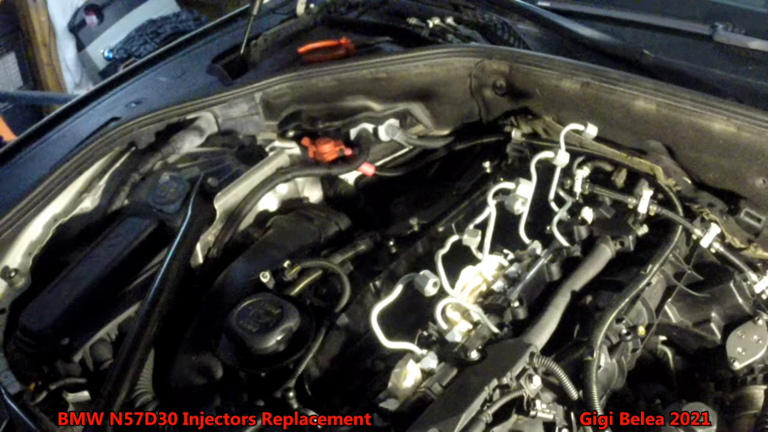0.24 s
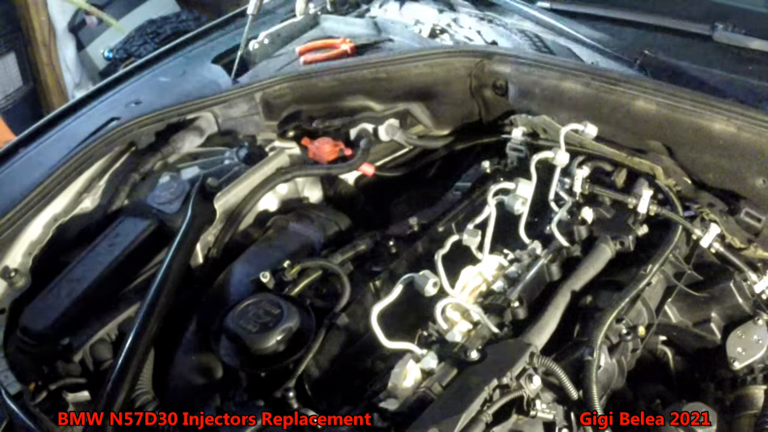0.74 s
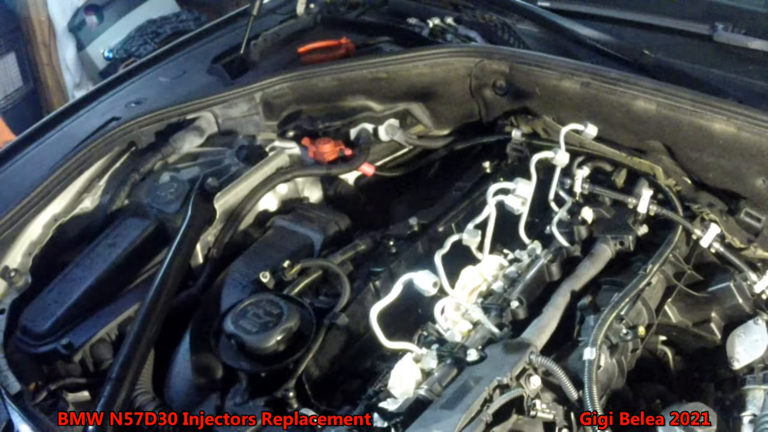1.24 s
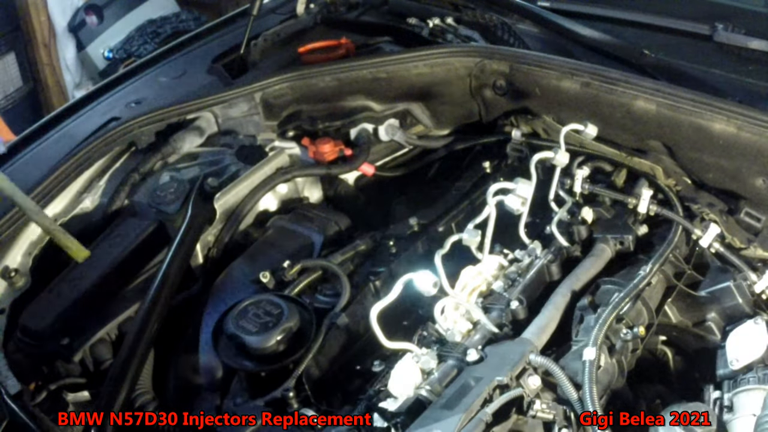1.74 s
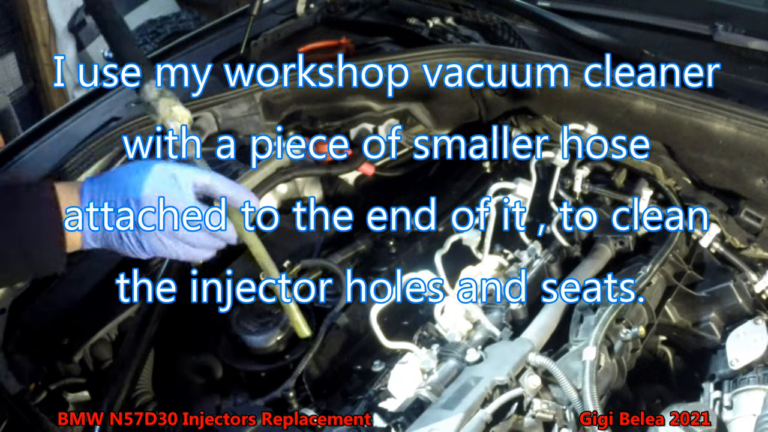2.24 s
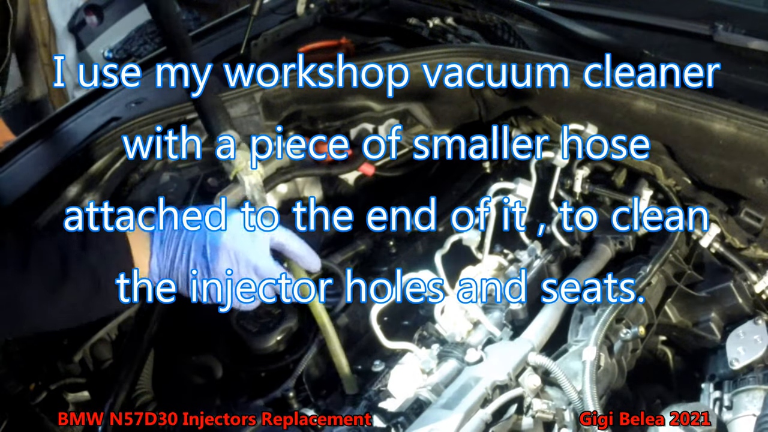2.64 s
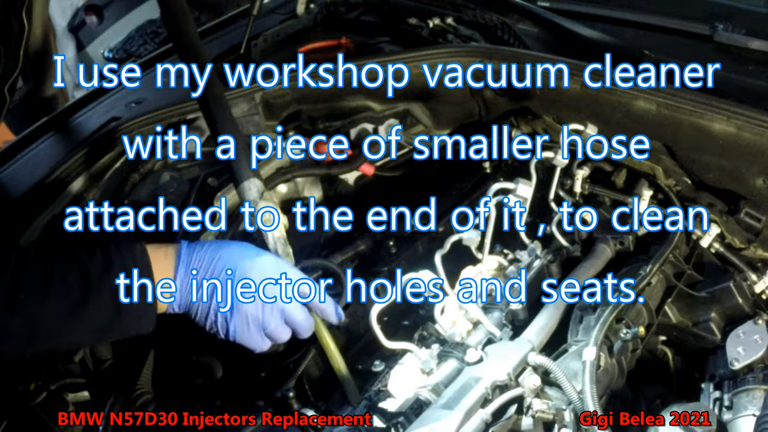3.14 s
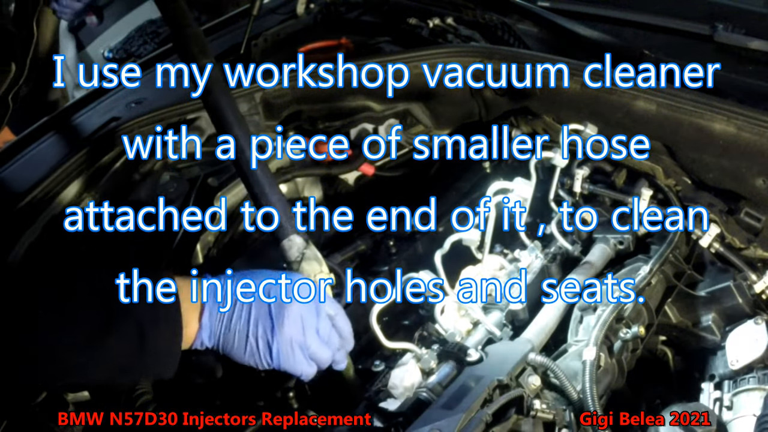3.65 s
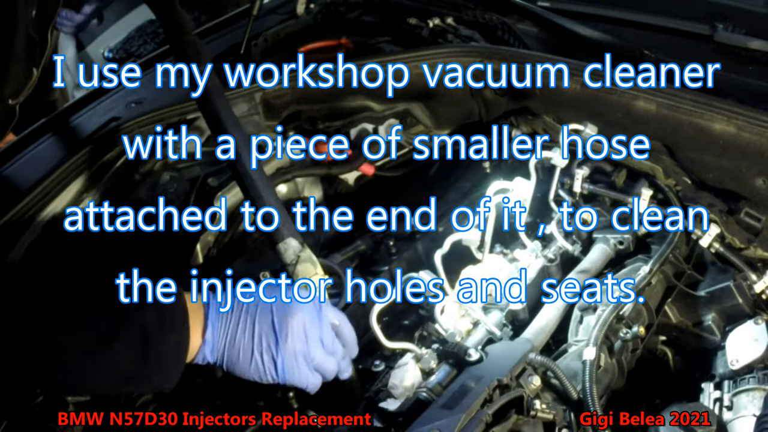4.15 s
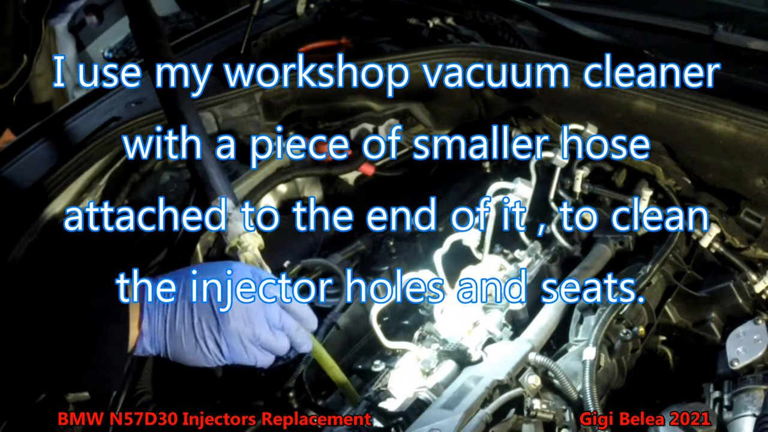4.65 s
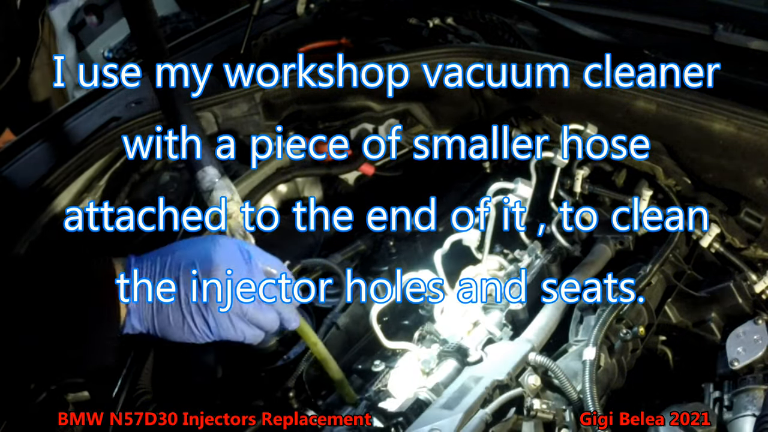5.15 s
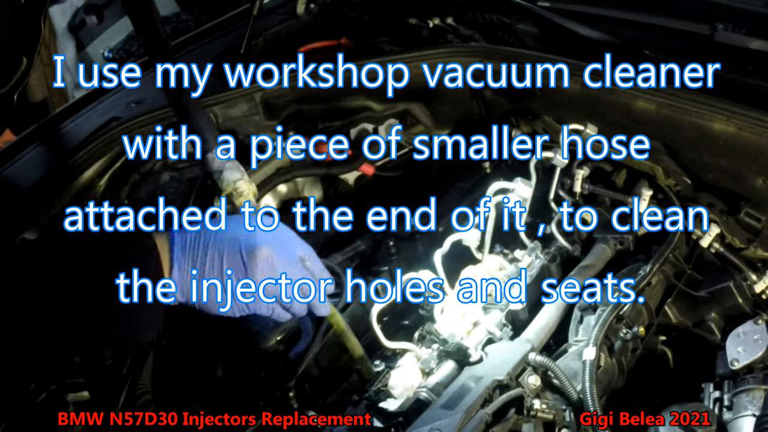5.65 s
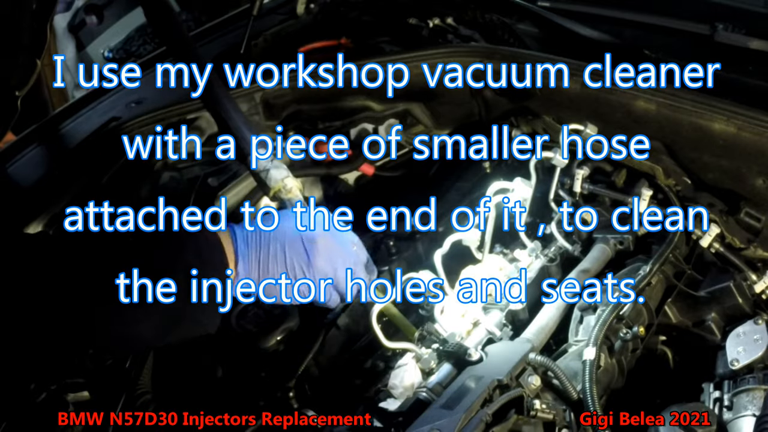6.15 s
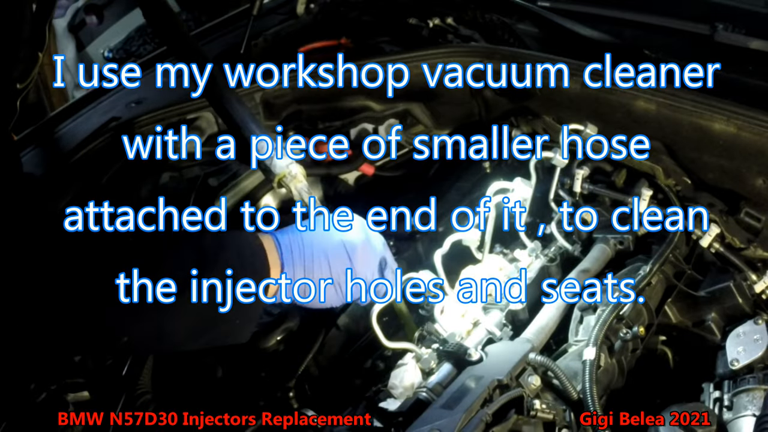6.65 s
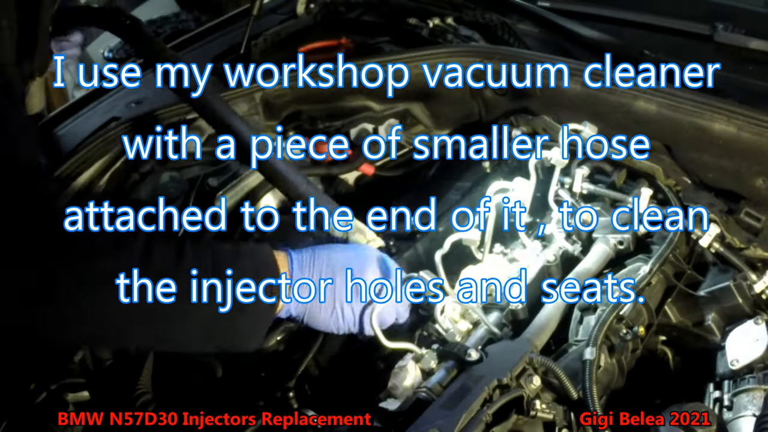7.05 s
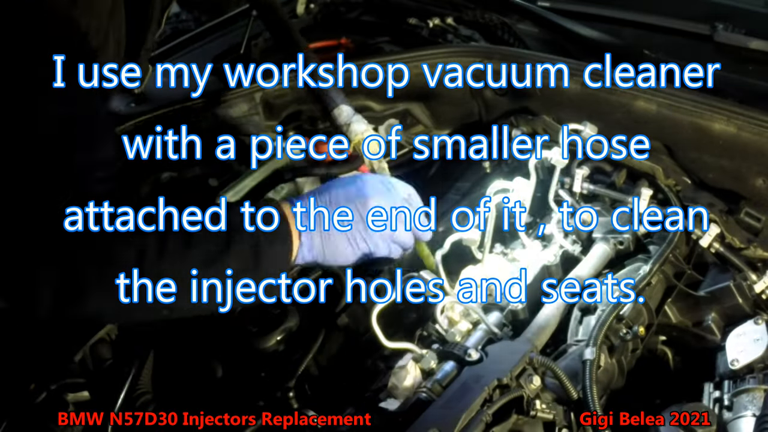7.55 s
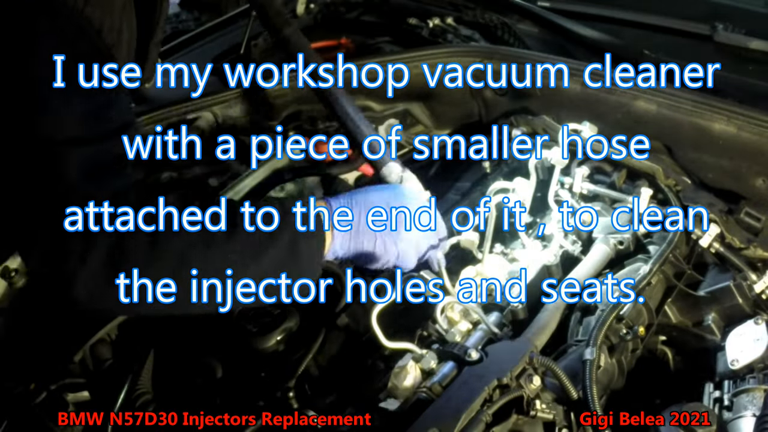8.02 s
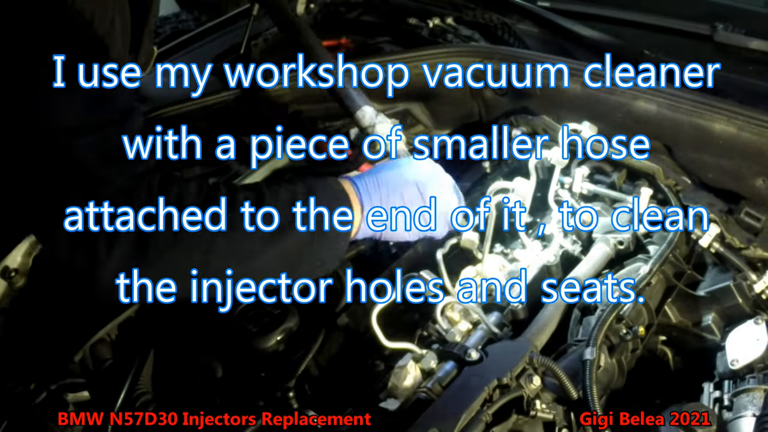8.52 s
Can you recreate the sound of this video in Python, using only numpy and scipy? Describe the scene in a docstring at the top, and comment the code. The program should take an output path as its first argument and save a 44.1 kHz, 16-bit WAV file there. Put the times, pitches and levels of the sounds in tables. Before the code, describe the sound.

A workshop vacuum spins up, hisses and flutters through a thin hose in an engine bay, then turns to a sped-up whistle and crackle.

```python
"""A workshop vacuum cleaner is switched on and spins up: shaft unbalance hums, fan blades sing, air roars
through the casing. Its thin hose is poked into an engine bay; air hisses past the tip, rasps and whistles
in the tube, and flutters when the tip half seals. Quiet room noise lies underneath. Near the end it all
runs ten times faster: the whine jumps to a high whistle, the flutter shrinks to crackles.
Both channels carry the same signal."""
import sys
import numpy as np
from scipy import signal
from scipy.fft import rfft, irfft, next_fast_len
from scipy.io import wavfile
from scipy.ndimage import uniform_filter1d

SR = 44100
rng = np.random.default_rng(int(sys.argv[2]) if len(sys.argv) > 2 else 0)


def wav_out(sig):
    """Save sig, one row per channel (or a flat mono array), as 16-bit PCM at SR to the path in sys.argv[1]."""
    wavfile.write(sys.argv[1], SR, np.round(np.clip(np.atleast_2d(sig).T, -1, 1) * 32767).astype(np.int16))


N = 387198

SWITCH_S, BORE_S, FAST_S = 0.127, 6.1, 6.806  # motor on; hiss takes the bore's colour; tenfold pace

# room noise spectrum: f/Hz, level/dB
ROOM_SPECTRUM = [(30, -7.5), (100, -6), (300, -5.5), (800, -1.5), (1500, -16.5), (3000, -30),
                 (5000, -35), (12000, -46)]
# faint room tones: f/Hz, level/dB
ROOM_TONES = [(3090, -69), (6180, -84), (9300, -88)]

# air spectra, past the tip and in the bore: f/Hz, level/dB
TIP_SPECTRUM = [(300, -16), (900, -2), (1500, -11), (2200, -8), (3000, -1.5), (4300, -7), (6000, -2),
                (8500, -8), (11000, -9.5), (14500, -28)]
BORE_SPECTRUM = [(300, -24), (900, 2.5), (1500, -11.5), (2200, -6.5), (3300, -8.5), (4400, -6.5),
                 (6000, -5), (8000, -7.5), (11000, -17), (14500, -35)]
# tip resonances: f/Hz, width/Hz, lift/dB
TIP_MODES = [(870, 43, 13.5), (1990, 140, 10), (4054, 61, 15), (4780, 65, 13.5), (5180, 72, 12),
             (5830, 360, 5), (7040, 170, 8.5), (8940, 470, 8), (10200, 450, 6)]
# pipe modes, fundamental first: lift/dB
PIPE_LIFTS = [7, 10, 11, 9, 6, 5]
# hose resonances: f/Hz, width/Hz, level/dB
RING_MODES = [(581, 166, -6), (885, 56, 3), (812.6, 14.5, -5), (1048, 102, -4), (1254, 100, -9.5),
              (1445, 29, -12.5), (1955, 380, -10.5), (2260, 270, -13.5)]
THUMP_MODES = [(124, 30, -1), (235, 120, -6.5), (550, 224, 9.5)]
WHISTLE_MODES = [(3924, 114, 6), (4340, 260, -0.5)]
# tip hiss among the engine parts, tube rasp: t/s, level/dB
HISS_LEVELS = [(2.6, -85), (2.8, -60), (2.87, -43), (3.3, -40.5), (3.8, -34.5), (4.3, -36.5), (4.9, -35),
               (5.04, -35), (5.4, -34.5), (5.8, -37), (5.92, -49)]
RASP_LEVELS = [(2.5, -90), (2.75, -55), (2.89, -32), (3.2, -23), (3.33, -38), (3.75, -34), (3.96, -30.5),
               (4.23, -34), (4.5, -28), (4.85, -23), (5.19, -43), (5.46, -34), (5.69, -35), (5.95, -53),
               (6.2, -43), (6.5, -31.5), (6.65, -31.5), (6.76, -60)]
# gushes as the tip comes free, tube whistles: t/s, length/s, level/dB
GUSHES = [(2.858, 0.028, -33.5), (3.13, 0.046, -37), (3.413, 0.04, -31.5), (3.511, 0.038, -30.5),
          (3.736, 0.052, -35), (3.862, 0.027, -29.5), (3.924, 0.033, -30), (4.007, .05, -39),
          (4.13, 0.052, -38), (4.396, .022, -32), (4.983, 0.032, -23.5), (5.085, 0.209, -24),
          (5.556, 0.15, -26), (6.129, 0.81, -24.5)]
WHISTLES = [(2.95, 1.4, -48), (3.16, 0.068, -32.5), (3.364, 0.11, -35.5), (4.426, .12, -38),
            (4.58, 0.24, -35.5), (4.86, .2, -43), (5.109, .18, -32.5), (5.353, 0.21, -30),
            (6.298, 0.13, -39)]
# tip seals and flutters: t/s, length/s, ring level/dB, thump re ring/dB
FLUTTERS = [(2.852, 0.081, -24, -28), (2.99, .036, -22, -30), (3.036, 0.085, -24.5, -23),
            (3.125, .064, -17.5, -7), (3.195, 0.028, -22, -5), (3.222, 0.016, -15.5, -11),
            (3.37, 0.14, -22, -9), (3.503, 0.026, -13.5, -12), (3.726, 0.048, -24.5, -25),
            (3.855, 0.034, -17, -14), (3.909, 0.038, -16, -15), (4.151, 0.038, -28.5, -7),
            (4.4, 0.027, -15.5, -20), (4.439, .051, -21.5, -7), (4.545, .08, -28, -11),
            (4.637, .045, -23, -9), (4.7, 0.018, -18.5, -26), (4.74, .076, -23, -6),
            (4.807, 0.045, -18, -21), (4.86, 0.088, -20.5, -32), (4.961, 0.037, -20, -14),
            (5.298, .031, -22, -24), (5.343, 0.071, -17.5, -14.5), (5.426, .052, -22.5, -25),
            (5.472, 0.024, -17.5, -16), (5.497, 0.082, -22.5, -17)]

# hose resonances, fast pace: f/Hz, width/Hz, level/dB
FAST_LOWER_MODES = [(5580, 690, 2.5), (6790, 600, 4.5), (7580, 670, 7)]
FAST_UPPER_MODES = [(8240, 550, -1), (8380, 440, 6.5), (8390, 260, -1), (9080, 300, -6)]
FAST_THUMP_MODES = [(1326, 230, 2.5), (1896, 420, 3)]
FAST_TOP1_MODES = [(10400, 720, 4.5), (10950, 360, -17), (11910, 470, 0)]
FAST_TOP2_MODES = [(13500, 270, -2), (14200, 300, -15), (13940, 610, 2), (15200, 350, -4)]
# fast flutters: t/s, length/s, upper ring level/dB, lower ring and thump offset/dB, top rings offset/dB
SPURTS = [(6.806, 0.092, -35, -6, -6), (6.967, 0.024, -27, 7, -2), (6.992, .042, -29.5, 8, -1),
          (7.115, 0.027, -28.5, 1, -14), (7.143, 0.064, -28.5, -8, -12), (7.22, 0.054, -39, 13.5, 2),
          (7.287, 0.012, -27, 3, 0), (7.337, 0.1, -33.5, 6, 1), (7.385, 0.031, -28.5, 6.5, -4),
          (7.434, .041, -40, -3, -2), (7.555, 0.14, -37.5, -4, -8), (7.712, 0.0053, -34.5, 10, -10),
          (7.743, 0.062, -32, 0, -8), (7.791, 0.016, -13, -5, -16), (7.811, 0.012, -20, -5, -14),
          (7.84, 0.031, -28.5, -5, -12), (7.932, 0.016, -17, -0.5, -15), (7.947, 0.026, -25.5, 2.5, -7),
          (7.976, 0.088, -31, 1.5, -8), (8.076, 0.02, -23.3, 1.5, -4), (8.098, 0.014, -16, 0, -20),
          (8.116, 0.018, -17.5, 1, -9), (8.17, .028, -28.3, -3, -7), (8.189, 0.061, -15.5, -0.5, -14),
          (8.251, 0.028, -21, -3, -14), (8.31, .063, -24.5, -3, -9), (8.376, 0.039, -24, -3.5, -11),
          (8.463, 0.13, -29, -12, -13), (8.615, 0.013, -27, -16, -16), (8.654, 0.053, -18.5, -12.5, -9),
          (8.719, 0.055, -26.5, -6, -11)]
# further offsets for lower ring, thump, top 1, top 2: gain/dB
SPURT_TRIMS = [-1.8, -13.5, -0.5, -3.5]
# bright ticks at the tip: t/s, level/dB
TICKS = [(7.05, -27), (7.068, -20), (7.083, -26), (7.1, -27), (7.247, -20), (7.908, -30), (8.003, -20.5),
         (8.02, -19), (8.041, -20), (8.643, -31)]
# tick share of lower ring, upper ring, thump, top 1, top 2: gain/dB
TICK_SHARES = [-2, -13, -15, -3.5, -5]

# spin-up stages: shortfall at switch-on/Hz, time constant/s
SPIN_UP = [(423.9, .186), (85.2, .412), (10.9, 3.66)]
# motor: t/s, hum level/dB, relative roar level at full speed/dB
MOTOR_LEVELS = [(.13, -46.5, -26), (.24, -27, -36), (.5, -20, -37), (1.07, -21.5, -37), (1.3, -28.5, -36.5),
                (1.45, -22.5, -37), (1.75, -26.5, -36), (1.95, -32, -36.5), (2.1, -27, -36.5),
                (2.7, -30, -37), (3.3, -25, -33.5), (4.1, -21.5, -38), (4.7, -21.5, -33),
                (5.6, -21.5, -36.5), (6.8, -21.5, -35.5)]
# blade tone at full speed: t/s, level/dB
BLADE_LEVELS = [(.14, -50), (.2, -42), (.24, -54), (.45, -47), (1.9, -44), (2.5, -50), (3, -53), (6.8, -52)]
# room nulls crossed by the rising hum: t/s, depth/dB, width/s
ROOM_NULLS = [(.2, 7, .02), (.255, 11, 0.014), (0.304, 13, 0.022), (.375, 9, 0.013), (0.439, 18, 0.012),
              (0.602, 19, 0.026), (.715, 12, 0.02), (.8, 17, 0.038), (.86, 14, 0.017), (1.22, 9, 0.043),
              (1.83, 7.5, 0.054)]
# breathy bands: shaft multiple, width/Hz, relative level/dB, lift at standstill/dB
SHAFT_BANDS = [(3.87, 170, -5, 30), (8, 170, -15, 30)]
# roar spectra, normal and fast pace: f/Hz, level/dB
ROAR_SPECTRUM = [(30, -7), (70, -15.5), (130, -3.5), (230, -4), (330, -14.5), (500, -4), (800, 3),
                 (1300, -7.5), (2200, -4), (3200, -15.5), (5000, -11), (7500, -18.5), (10500, -21.5),
                 (14500, -43.5)]
FAST_ROAR_SPECTRUM = [(40, -46), (150, -19.5), (500, -14.5), (1000, -17), (1400, -9), (2300, -11),
                      (3500, -14.5), (5000, -8), (7000, 2.5), (8500, -5.5), (10000, -5.5), (12000, -11),
                      (14500, -10), (15500, -7)]
# casing resonances, normal and fast pace: f/Hz, width/Hz, lift/dB
CASING_MODES = [(875, 52, 2.5), (1464, 14, 9.5), (1970, 840, 4.5), (2420, 100, -25), (2650, 54, 9),
                (3540, 22, 11.5), (4224, 230, 6), (4700, 55, 1.5), (5530, 180, 3.5), (6470, 1700, 7),
                (8930, 1200, 7)]
FAST_CASING_MODES = [(1003, 27, 6), (2320, 47, 11), (7700, 150, -7), (8500, 490, 4), (9100, 750, 8),
                     (10500, 120, -7), (11550, 100, 0), (12900, 170, 1), (13730, 150, 2), (14600, 1200, 6)]
# roar, fast pace: t/s, level/dB
FAST_ROAR_LEVELS = [(6.81, -30), (7.3, -27.5), (7.53, -31), (7.65, -30.5), (8.07, -28.5), (8.44, -31.5),
                    (8.78, -29)]
# shaft tone, fast pace: t/s, f/Hz
FAST_SHAFT_PITCH = [(6.81, 6130), (7.0, 6130), (7.17, 6180), (7.31, 6125), (7.72, 6140), (7.75, 6215),
                    (7.78, 6210), (7.82, 6160), (7.86, 6200), (7.9, 6160), (7.97, 6150), (8.0, 6220),
                    (8.09, 6270), (8.12, 6175), (8.47, 6145), (8.57, 6185), (8.65, 6165), (8.7, 6215),
                    (8.78, 6265)]
# that tone across a room null, paired lists: f/Hz; level/dB
FAST_NULL_HZ = [6125, 6160, 6200, 6225, 6270]
FAST_NULL_DB = [-25, -26.5, -37, -26.5, -22]


def undb(db):
    return 10 ** (np.asarray(db) / 20)


def unit(x):
    return x / np.sqrt(np.mean(x ** 2))


def lowpass(x, hz):
    return signal.sosfilt(signal.ellip(10, .2, 80, hz, fs=SR, output="sos"), x)


def curves(table):
    """Table columns, linearly interpolated in time."""
    times_s, *columns = np.transpose(table)
    return [np.interp(np.arange(N) / SR, times_s, column) for column in columns]


def held(starts_s, lengths_s, levels_db, edge_s):
    """Gain of flat events with sloped edges; overlaps add in power."""
    power = np.full(N, 1e-14)
    for start_s, length_s, gain in zip(starts_s, lengths_s, undb(levels_db)):
        power[int(start_s * SR):int((start_s + length_s) * SR)] += gain ** 2
    return uniform_filter1d(np.sqrt(power), max(int(edge_s * SR), 1))


def jitter(rate_hz):
    """Slewed random steps, rms 1."""
    hold = max(int(SR / rate_hz), 2)
    steps = np.repeat(rng.standard_normal(N // hold + 1), hold)
    return unit(uniform_filter1d(steps, hold)[:N])


def tone(hz, wobble):
    """Sine with trembling pitch, rms 1."""
    return np.sqrt(2) * np.sin(2 * np.pi * np.cumsum(hz * (1 + wobble * jitter(60))) / SR)


def air(spectrum, modes, flicker_db, rate_hz):
    """Coloured noise with resonant lifts, rms 1; each octave flickers alone."""
    size = next_fast_len(N, True)
    hz = np.maximum(np.fft.rfftfreq(size, 1 / SR), 1)
    points_hz, points_db = np.transpose(spectrum)
    db = np.interp(np.log(hz), np.log(points_hz), points_db)
    db += sum(lift_db / (1 + (2 * (hz - mode_hz) / width_hz) ** 2) for mode_hz, width_hz, lift_db in modes)
    noise = rfft(rng.standard_normal(size)) * undb(db)
    octave = np.log2(hz / 40)
    windows = (np.cos(np.pi / 2 * np.clip(octave - k, -1, 1)) ** 2 for k in range(10))
    bands = (irfft(noise * window, size)[:N] for window in windows)
    return unit(sum(undb(flicker_db * jitter(rate_hz)) * band for band in bands))


def resonate(x, modes):
    """Parallel resonances, each passed twice for deep valleys."""
    out = 0
    for k, (hz, width_hz, db) in enumerate(modes):
        b, a = signal.iirpeak(hz, hz / (1.5 * width_hz), SR)
        band = signal.lfilter(b, a, signal.lfilter(b, a, x))
        out += (-1) ** k * undb(db) * band / np.sqrt(width_hz)
    return out


def resonant_noise(modes):
    return unit(resonate(rng.standard_normal(N), modes))


def room():
    """Quiet workshop noise with faint steady tones."""
    tones = sum(undb(db) * tone(hz, wobble=.002) for hz, db in ROOM_TONES)
    return tones + undb(-43.5) * air(ROOM_SPECTRUM, [], flicker_db=.54, rate_hz=7.3)


def switch_click(level_db=-43, t60_s=.13):
    """The switch clicks: bright, decaying noise."""
    age_s = np.arange(N) / SR - SWITCH_S
    decay = (age_s > 0) * undb(level_db - 60 * np.maximum(age_s, 0) / t60_s)
    return decay * resonant_noise([(4200, 2300, 9), (6000, 2000, -6), (9500, 3000, -16.5)])


def flutter(drives, mode_sets, rate_hz, rough_db=2.5):
    """Uneven puffs at the half-sealed tip ring the hose. Returns sound and the first set's envelope."""
    puffs = unit(undb(rough_db * jitter(rate_hz)))
    out = np.zeros(N)
    onset = np.argmax(drives[0] > 1e-6)
    for drive, modes in zip(drives, mode_sets):
        noise = rng.standard_normal(N - onset)
        filter_rms = np.std(resonate(noise[:SR], modes))
        out[onset:] += resonate(noise * (drive * puffs)[onset:], modes) / filter_rms
    return out, drives[0] * puffs


def hose(pipe_hz=1445, pipe_width_hz=260):
    """Drawn air hisses past the tip and rasps, whistles and flutters in the tube."""
    (hiss_db,), (rasp_db,) = curves(HISS_LEVELS), curves(RASP_LEVELS)
    pipe_modes = [(k * pipe_hz, pipe_width_hz, db) for k, db in enumerate(PIPE_LIFTS, 1)]
    tip = air(TIP_SPECTRUM, TIP_MODES, flicker_db=1.9, rate_hz=100)
    bore = air(BORE_SPECTRUM, pipe_modes, flicker_db=.44, rate_hz=100)
    rasp = undb(rasp_db + 1.4 * jitter(40)) * resonant_noise(RING_MODES)
    whistle = held(*np.transpose(WHISTLES), edge_s=.044) * resonant_noise(WHISTLE_MODES)
    starts_s, lengths_s, ring_db, thump_db = np.transpose(FLUTTERS)
    drives = [held(starts_s, lengths_s, ring_db + offset_db, edge_s=.02) for offset_db in (0, thump_db, -21)]
    bursts, puffs = flutter(drives, (RING_MODES, THUMP_MODES, WHISTLE_MODES), rate_hz=130)
    gush = held(*np.transpose(GUSHES), edge_s=.023)
    flow = np.sqrt(undb(hiss_db) ** 2 + gush ** 2 + (undb(-15) * puffs) ** 2)
    hiss = flow * np.where(np.arange(N) < BORE_S * SR, tip, bore)
    return hiss + rasp + whistle + bursts


def fast_hose(tick_s=.0076, edge_s=.003):
    """Tenfold pace: spurts and ticks crackle in the hose. Returns sound and puff envelope."""
    starts_s, lengths_s, upper_db, low_db, top_db = np.transpose(SPURTS)
    lower_db, thump_db, top1_db, top2_db = SPURT_TRIMS
    mode_sets = FAST_LOWER_MODES, FAST_UPPER_MODES, FAST_THUMP_MODES, FAST_TOP1_MODES, FAST_TOP2_MODES
    offsets_db = low_db + lower_db, 0, low_db + thump_db, top_db + top1_db, top_db + top2_db
    spurts = [held(starts_s, lengths_s, upper_db + db, edge_s) for db in offsets_db]
    tick_starts_s, tick_db = np.transpose(TICKS)
    ticks = held(tick_starts_s, [tick_s] * len(TICKS), tick_db, edge_s)
    drives = [np.hypot(spurt, undb(db) * ticks) for spurt, db in zip(spurts, TICK_SHARES)]
    return flutter(drives, mode_sets, rate_hz=700)


def vent(shaft_hz, vent_hz=2250, vent_width_hz=900):
    """The exhaust vent passes shaft bands near its resonance, lifted while the motor strains for speed."""
    strain = 1 - shaft_hz / shaft_hz.max()
    bands = 0
    for order, width_hz, db, lift_db in SHAFT_BANDS:
        hz = order * shaft_hz
        passed = 1 / (1 + (2 * (hz - vent_hz) / vent_width_hz) ** 4)
        bands += passed * undb(db + lift_db * strain) * jitter(width_hz) * tone(hz, wobble=0)
    return bands


def motor(top_hz=613.6, blades=12, roar_exponent=2.43, blade_exponent=2, attack_s=.009):
    """Spin-up: shaft unbalance hums, fan blades sing, air roars through the casing."""
    t = np.arange(N) / SR
    age_s = np.maximum(t - SWITCH_S, 0)
    shaft_hz = top_hz - sum(short_hz * np.exp(-age_s / tau_s) for short_hz, tau_s in SPIN_UP)
    speed_db = 20 * np.log10(shaft_hz / top_hz)
    (hum_db, roar_db), (blade_db,) = curves(MOTOR_LEVELS), curves(BLADE_LEVELS)
    hum_db -= sum(db * np.exp(-((t - at_s) / width_s) ** 2) for at_s, db, width_s in ROOM_NULLS)
    hum = undb(hum_db) * tone(shaft_hz, wobble=.0007)
    blade_db += blade_exponent * speed_db + 3 * jitter(45)
    whine = undb(blade_db) * tone(blades * shaft_hz, wobble=.0035)
    rush = vent(shaft_hz) + undb(4) * air(ROAR_SPECTRUM, CASING_MODES, flicker_db=.7, rate_hz=14)
    roar = undb(roar_db + roar_exponent * speed_db) * rush
    return np.minimum(age_s / attack_s, 1) * (hum + whine + roar)


def fast_motor(puffs, mains_hz=1002):
    """Tenfold pace: casing roar, mains tone and a shaft whistle that ducks under loud puffs."""
    (shaft_hz,), (roar_db,) = curves(FAST_SHAFT_PITCH), curves(FAST_ROAR_LEVELS)
    smooth_puffs = uniform_filter1d(puffs, int(.008 * SR))
    duck = 1 / (1 + (smooth_puffs / undb(-13)) ** 2)
    shaft_db = np.interp(shaft_hz, FAST_NULL_HZ, FAST_NULL_DB)
    whistle = duck * undb(shaft_db) * tone(shaft_hz, wobble=.000603)
    roar = undb(roar_db) * air(FAST_ROAR_SPECTRUM, FAST_CASING_MODES, flicker_db=1.7, rate_hz=90)
    mains = undb(-58) * tone(mains_hz, wobble=.0012)
    return whistle + roar + mains


def scene():
    """Normal pace, then a hard cut to the fast pace."""
    normal = lowpass(motor() + hose() + switch_click() + room(), hz=15250)
    crackle, puffs = fast_hose()
    fast = fast_motor(puffs) + crackle
    mono = np.where(np.arange(N) < FAST_S * SR, normal, fast)
    return np.array([mono, mono])


def record(dry):
    """Soft peak limiting, then a treble cut."""
    return lowpass(.9 * np.tanh(dry / .9), hz=15750)


dry = scene()
out = record(dry)
wav_out(out)
```